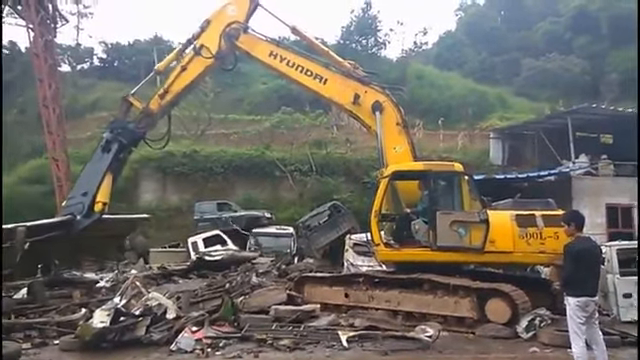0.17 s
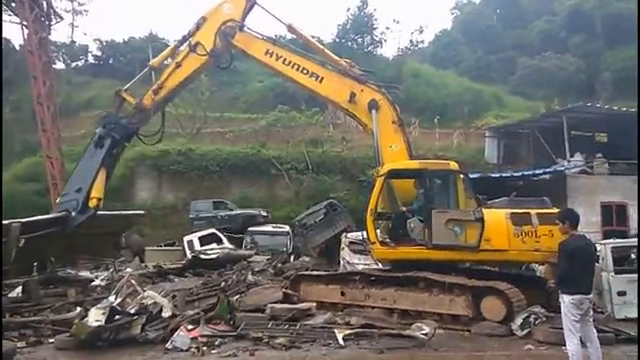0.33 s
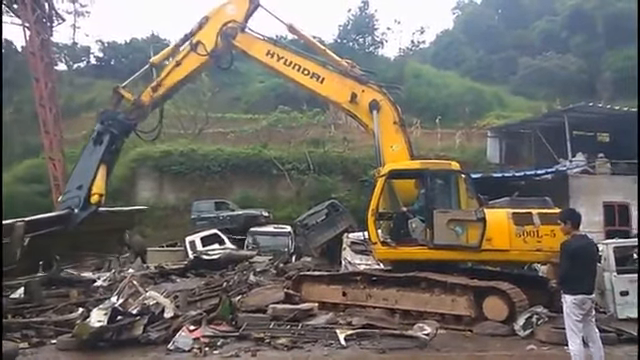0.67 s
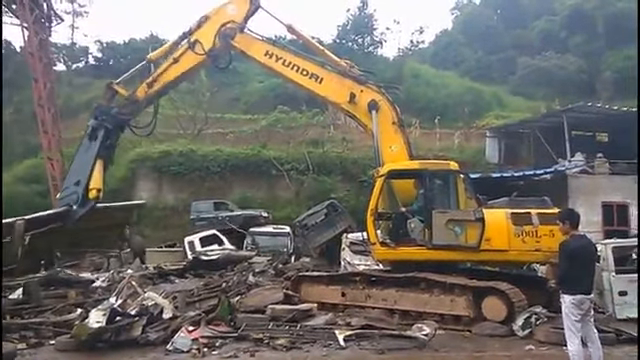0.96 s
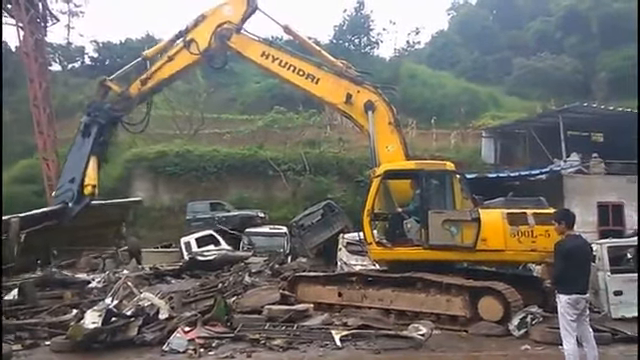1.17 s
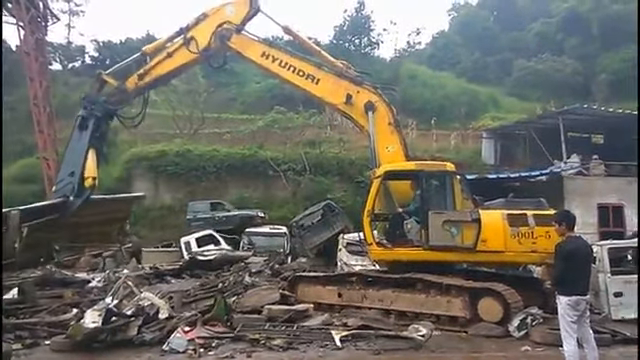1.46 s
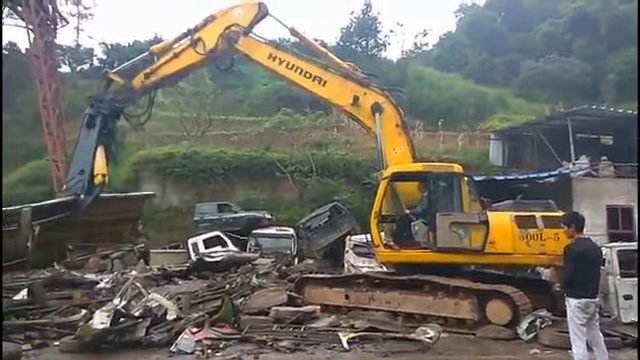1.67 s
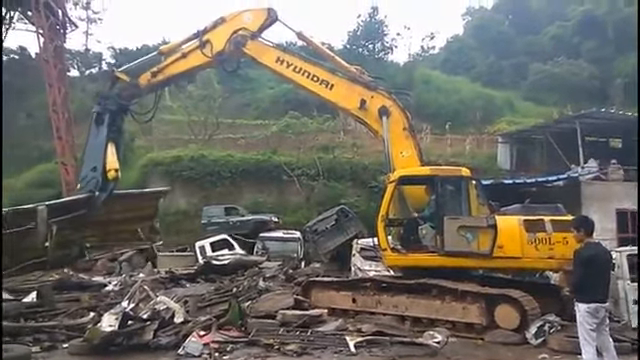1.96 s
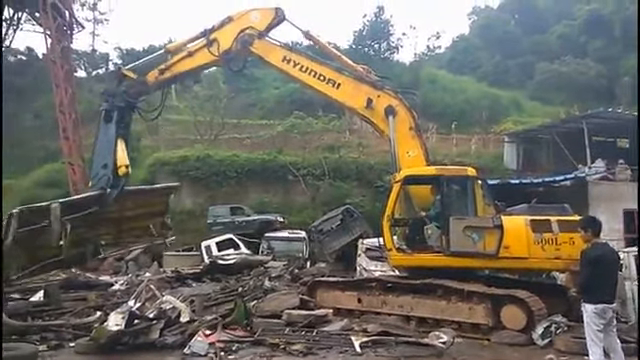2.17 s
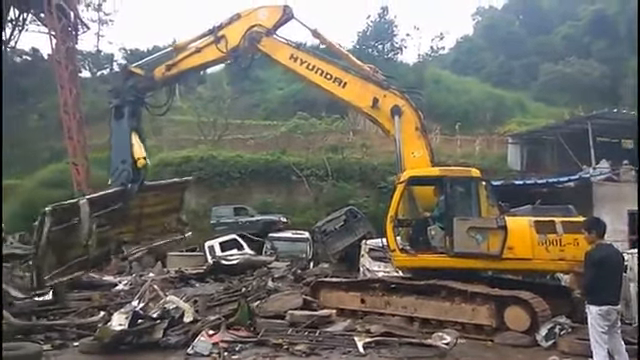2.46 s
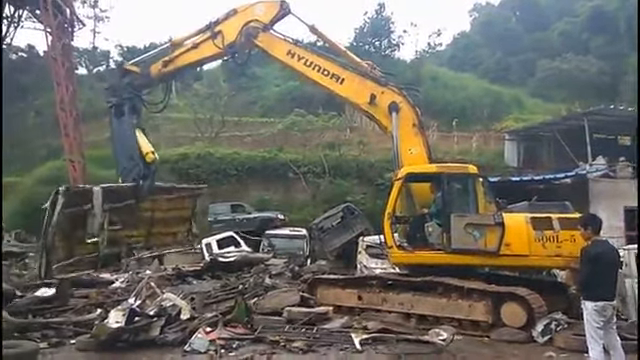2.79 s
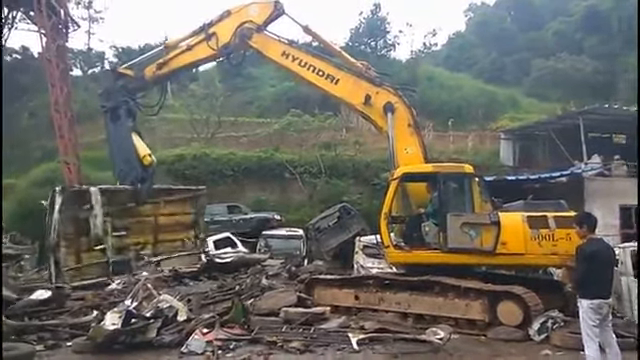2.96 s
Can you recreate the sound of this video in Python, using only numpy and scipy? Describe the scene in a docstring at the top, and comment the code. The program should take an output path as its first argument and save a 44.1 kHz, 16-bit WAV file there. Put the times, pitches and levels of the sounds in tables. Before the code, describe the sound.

A diesel excavator drones at steady high speed throughout, a rough low roar with pump hum and faint gear whine. Until about 1.2 s only the engine is heard; then scattered scrap rattles and clinks. Around 2.1 s a steel truck bed thuds and groans, the hum dipping. From 2.6 s louder hollow booms, clangs and grinding crowd together, still going at 3.1 s, with brief open-yard echoes.

```python
"""A steady engine roar, pump hum and whine: a diesel excavator idles high in an open scrapyard.
Its shear tips up a steel truck bed: scrap clatters and clangs, then the bed booms, groans and grinds.
Roar is banded noise gated by the firings; hum and whine are sines locked to the shaft.
Metal is rings driven by random ticks and soft blows, groans are sagging sines; the yard echoes it."""
import sys
import numpy as np
from scipy import signal
from scipy.fft import rfft, irfft, next_fast_len
from scipy.io import wavfile

SR = 44100
rng = np.random.default_rng(int(sys.argv[2]) if len(sys.argv) > 2 else 0)


def convert_level_to_amplitude(level_db):
    """Map a level in decibels to its linear amplitude factor."""
    exponent = np.asarray(level_db, float) / 20
    return 10 ** exponent


def master_out(mix):
    """Clip the mix to full scale and print it as 16-bit PCM to the path in sys.argv[1]."""
    frames = np.transpose(np.atleast_2d(mix))
    ceiling = np.clip(frames, -1, 1)
    pcm = np.round(ceiling * 32767).astype(np.int16)
    wavfile.write(sys.argv[1], SR, pcm)


N = 138033
T_S = np.arange(N) / SR

# engine speed: time_s, turns_per_s
SHAFT = [(0, 24.4), (.4, 24.2), (.9, 24.5), (1.8, 24.55), (2.3, 24.35), (3.13, 24.4)]
# piston pump pulses: multiple of pulse rate, level_db rms
PUMP = [(1, -35), (2, -43.5), (3, -45), (4, -48)]
# hum fades as the load comes on: time_s, gain_db
PUMP_FADE = [(0, 0), (.4, -2), (.8, 0), (2.05, 0), (2.09, -6), (2.26, -3), (2.33, -9), (3.13, -10)]
# exhaust orders: multiple of firing rate, level_db rms
EXHAUST = [(1, -47), (4 / 3, -44)]
# gear whine: mean_pitch_hz, level_db rms
WHINE = [(1020, -49), (1447, -46.5)]
# roar spectrum: freq_hz, relative_level_db
ROAR = [(18, -47.5), (30, -15.5), (57, -9), (78, -6.5), (97, -6), (141, -9), (162, -12), (190, -8.5),
        (251, -10), (323, -12), (425, -8.5), (500, -14.5), (645, -9), (720, -11), (820, -17), (955, -19),
        (1050, -12), (1480, -16.5), (1660, -24.5), (1850, -18), (2960, -21), (3750, -28), (4700, -25.5),
        (5510, -23.5), (6100, -29), (6800, -33.5), (7200, -33), (7600, -19.5)]
# relative strength of each cylinder: level_db
CYLINDER_DB = [0, -7, -2, -9, -4, -7]
# scrap slips: peak_s, treble_db, low_db (900 Hz), mid_db (2500 Hz), fall_t60_s
CLATTER = [(1.193, -21, -16.5, -25, 0.077), (1.213, -25.5, -31.5, -25, 0.13),
           (1.3696, -20.5, -26.5, -31, 0.18), (1.529, -28, -31.5, -39.5, 0.44), (1.563, -27, -30, -34, .15),
           (1.5785, -20.5, -32.5, -36.5, 0.13), (1.604, -24, -31.5, -25.5, 0.1),
           (1.6277, -22.5, -30, -52.5, 0.16), (1.747, -23, -30, -34, 0.1),
           (1.905, -18, -36.5, -22.5, 0.076), (1.934, -21, -43, -37.5, 0.078),
           (2.091, -21, -24.5, -17.5, 0.075), (2.122, -20.5, -36, -32.5, 0.1),
           (2.15, -21, -29, -22.5, 0.23), (2.2884, -30.5, -15.5, -29, 0.2),
           (2.608, -21.5, -22.5, -17, 0.25), (2.631, -24, -17.5, -26, 0.39),
           (2.71, -26, -10.5, -12.5, 0.11), (2.8181, -40.5, -9, -14.5, 0.067),
           (2.872, -13, -14, -16.5, 0.08), (2.886, -20, -10, -20.5, 0.045), (2.911, -17, -21.5, -24.5, 0.1),
           (2.931, -22, -23, -20, 0.088), (2.9698, -19, -27, -19.5, 0.25), (3.108, -33, -8, -25, 0.28)]
# loose scrap colour: freq_hz, gain_db
SCRAP = [(400, -15.5), (900, -17), (1700, -14.5), (2500, -12), (4200, -14.5), (5600, -11.5), (6300, -14.5),
         (6900, -19), (7600, -5)]
# bed dragged over the pile: time_s, deep_groan_db, higher_groan_db, grind_db
DRAG = [(1.9, -58.5, -70.5, -42), (2.042, -49.5, -42, -40.5), (2.079, -50.5, -38.5, -34.5),
        (2.139, -36, -34, -32), (2.2, -35.5, -48.5, -37.5), (2.27, -39, -39.5, -42.5),
        (2.345, -34.5, -45.5, -39), (2.42, -33, -46.5, -39), (2.52, -42, -45.5, -40),
        (2.571, -33, -32.5, -26.5), (2.63, -38, -29.5, -33.5), (2.721, -28.5, -36.5, -28),
        (2.769, -27.5, -32, -26.5), (2.801, -41.5, -31.5, -24), (2.859, -47.5, -26.5, -30),
        (2.899, -38.5, -34, -27.5), (2.97, -29.5, -36, -29), (3.04, -32.5, -31, -30),
        (3.09, -33, -31, -28.5), (3.13, -19, -24, -33.5)]
# grinding colour: freq_hz, gain_db
GRIND = [(400, -14.5), (900, -13.5), (2500, -5.5), (4000, -11), (5700, -8.5), (7600, -12)]
# single plates clang: start_s, pitch_hz (lower of a pair), drive_db, length_s
CLANGS = [(1.187, 2636, -32.5, .025), (1.189, 3910, -31, 0.025), (1.553, 3900, -30.5, .055),
          (1.575, 5900, -32, 0.021), (1.623, 6530, -36, .015), (1.632, 5350, -37, .04),
          (2.072, 717, -32.5, 0.057), (2.145, 5620, -26, .012), (2.624, 735, -26.5, .02),
          (2.694, 5700, -28.5, .03), (2.866, 5830, -27, .025), (2.871, 4860, -31, 0.024),
          (2.881, 1970, -23.5, 0.01), (2.964, 5200, -24.5, .022), (2.965, 2450, -31.5, 0.027),
          (2.604, 783, -25.5, .03), (2.701, 1118, -22.5, 0.025), (2.809, 1277, -27, 0.043),
          (2.877, 1064, -25.5, 0.047), (2.88, 1476, -28, 0.028), (2.912, 820, -24.5, 0.02),
          (3.121, 813, -31.5, 0.099)]
# bed slips in step with a deep mode: start_s, pitch_hz (at onset), level_db, length_s
GROANS = [(2.025, 232.7, -28.5, .055), (2.111, 256.5, -26, .05), (2.112, 124.2, -28.5, .1),
          (2.605, 119.5, -20, 0.15), (2.77, 246.5, -19.5, .075), (2.83, 219.2, -25.5, .06),
          (3.02, 226.7, -27.5, 0.081)]
# bed is struck: start_s, relative_peak_db, way (1 pushed in, -1 sprung out)
BLOWS = [(2.09, -8, -1), (2.128, -11.5, 1), (2.169, -23.5, -1), (2.192, -12, 1), (2.619, -5.5, -1),
         (2.633, -7, 1), (2.693, -7, 1), (2.713, -6.5, -1), (2.797, -10.5, 1), (2.832, -14.5, 1),
         (3.112, -10, 1)]
# truck bed modes: pitch_hz, gain_db, free_t60_s
BED = [(59.6, -11.5, 0.07), (119.7, -3.5, 0.24), (136.2, -3.5, 0.21), (168.5, -4.5, 0.036),
       (213, -6, 0.072), (252.3, -1, 0.13), (317.2, -7.5, 0.43), (357, -7, 0.69), (448, -18, 0.43),
       (550, -16.5, 0.11), (746, -8, 0.12), (1090, -23.5, 0.17)]
# off the piles and slope: delay_s, gain_db
ECHOES = [(.021, -11.5), (.037, -13), (.066, -14), (.11, -16.5)]
# left-right likeness: freq_hz, correlation
LIKENESS = [(60, 1), (180, 1), (370, 0.99), (540, 0.88), (780, 0.83), (1120, 0.26), (1480, -0.0049),
            (1620, -0.36), (1780, -0.43), (1950, -0.13), (2600, -0.15), (3450, -0.02), (3780, 0.31),
            (4150, 0.22), (4850, -0.07), (7000, 0.027)]
# left minus right: freq_hz, difference_db
LEAN = [(60, 0), (400, 0.5), (760, -1), (1100, -0.5), (1500, -4), (1970, 1.5), (2700, 5), (3700, 2.5),
        (4400, 0.5), (5500, 13), (6100, 9), (6800, 3), (7400, 2.5)]

FIRINGS_PER_TURN, PISTONS_PER_TURN = 3, 9
ROAR_DB, BAND_WANDER_DB, BAND_WANDER_HZ = -28.5, 2., 10.7  # rate at the lowest band; treble is faster
THROB_SHARE, THROB_DECAY_S = .055, .0096  # share of roar gated by firings
LINE_WAVER_DB, UPPER_FLUTTER_DB, PUMP_JITTER = 1., 3.5, .002  # jitter: share of shaft speed
RISE_S, SCRAP_RING_CYCLES = .005, 150
TICKS_PER_S, TICK_SPREAD_DB = 1800., 3
RING_WANDER_DB = 3.  # random level wander of each scrap ring
CLANG_T60_S = .058  # at 1 kHz; higher plates die sooner
GROAN_SAG = .034  # share of pitch lost along a groan
SLIPS_PER_S, DEEP_HZ, BED_FLOOR_HZ = 300., 190, 61.4
BLOW_CONTACT_S, BLOW_GAIN_DB = .0006, -10.5
BLOW_DAMPING = .12  # share of the free t60 left when pressed on the pile
BLOW_FLOOR_HZ = 80  # high-pass on the blows keeps their lowest bass thin
SIDE_BASS_WANDER_DB, SIDE_BASS_HZ = 14, 780  # bass of the side signal drops in and out; its corner
TOP_HZ = 8440


def rms_one(x):
    """Scale to rms 1."""
    return x / np.sqrt(np.mean(x ** 2) + 1e-20)


def in_time(rows):
    """Columns of a table joined by lines in time."""
    time_s, *columns = np.transpose(rows)
    return [np.interp(T_S, time_s, column) for column in columns]


def at_hz(points, hz):
    """Read a table on a log-frequency axis."""
    table_hz, value = np.transpose(points)
    return np.interp(np.log(hz + 1e-3), np.log(table_hz), value)


def drift(rate_hz):
    """Slow random wander of rms 1: noise through two equal low-pass poles."""
    pole = np.exp(-80 * np.pi * rate_hz / SR)  # runs at SR / 40
    noise = rng.standard_normal(N // 40 + 2002)
    slow = signal.lfilter([1], [1, -2 * pole, pole * pole], noise)[2000:]
    return np.interp(np.arange(N) / 40, np.arange(len(slow)), rms_one(slow))


def ring(clicks, hz, t60_s):
    """Resonator: a unit click starts a decaying sine of height 1."""
    r, w = convert_level_to_amplitude(-60 / (t60_s * SR)), 2 * np.pi * hz / SR
    return signal.lfilter([0, np.sin(w)], [1, -2 * r * np.cos(w), r * r], clicks + 1e-18)


def driven(force, hz, t60_s):
    """A ring kept going by a click train, at about the power of the train."""
    return ring(force, hz, t60_s) * np.sqrt(4 * np.log(1000) / (t60_s * SR))


def ticks(rate_per_s, spread_db):
    """Two random trains of uneven clicks of either sign, joint rms 1."""
    size_db = spread_db * np.minimum(rng.exponential(1, (2, N)), 4)
    size = convert_level_to_amplitude(size_db) * rng.choice([-1, 1], (2, N))
    return rms_one(size * (rng.random((2, N)) < rate_per_s / SR))


def roar(turns):
    """Casing, fan and exhaust noise throbs with each firing; its third-octaves wander at random."""
    fired = turns * FIRINGS_PER_TURN
    decay_firings = THROB_DECAY_S * FIRINGS_PER_TURN * SHAFT[0][1]
    gate = convert_level_to_amplitude(np.array(CYLINDER_DB)[fired.astype(int) % 6]) * np.exp(-(fired % 1) / decay_firings)
    hz = np.fft.rfftfreq(N, 1 / SR)
    tinted = rfft(rng.standard_normal((2, N))) * convert_level_to_amplitude(at_hz(ROAR, hz))
    out = 0
    for k in range(26):
        band = np.clip(1 - abs(3 * np.log2((hz + 1) / 25) - k), 0, 1)
        wander_db = BAND_WANDER_DB * drift(BAND_WANDER_HZ * np.sqrt(1 + k / 4))
        out = out + irfft(tinted * band, N) * convert_level_to_amplitude(wander_db)
    throb = 1 - THROB_SHARE + THROB_SHARE * rms_one(gate)
    return convert_level_to_amplitude(ROAR_DB) * rms_one(out * throb)


def tones(turns):
    """Pump pulses, exhaust orders and gear whine as wavering sines locked to the shaft."""
    jitter = np.cumsum(PUMP_JITTER * SHAFT[0][1] * drift(16.7)) / SR
    pump = PISTONS_PER_TURN * (turns + jitter)
    fade_db = in_time(PUMP_FADE)[0]
    lines = [(k * pump, db + fade_db + (k > 1) * UPPER_FLUTTER_DB * drift(22)) for k, db in PUMP]
    lines += [(k * FIRINGS_PER_TURN * turns, db) for k, db in EXHAUST]
    whine_s = pump / pump[-1] * T_S[-1]  # time warped to follow the pump
    lines += [(hz * whine_s, db + UPPER_FLUTTER_DB * drift(9)) for hz, db in WHINE]
    out = 0
    for cycles, db in lines:
        height = np.sqrt(2) * convert_level_to_amplitude(db + LINE_WAVER_DB * drift(13))
        out = out + height * np.sin(2 * np.pi * (cycles + rng.random()))
    return np.array([out, np.roll(out, 60)])


def scrap(grind_db):
    """Ticks dealt to 80 sheet-metal rings; each slip swells fast and dies with its own colour."""
    peak_s, treble_db, low_db, mid_db, fall_s = np.transpose(CLATTER)
    late_s = T_S - peak_s[:, None]
    rise = np.exp(np.minimum(late_s, 0) / RISE_S)
    fall = convert_level_to_amplitude(-60 * np.maximum(late_s, 0) / fall_s[:, None])
    swell = np.where(late_s < 0, rise, fall)
    pitches_hz = np.linspace(20, 87, 80) ** 2 * rng.uniform(.99, 1.01, 80)
    train = ticks(TICKS_PER_S, TICK_SPREAD_DB)
    dealt = rng.integers(0, 8, (2, N))  # ten rings share each hand
    out = 0
    for k, hz in enumerate(pitches_hz):
        slip_db = [np.interp(np.log(hz), np.log([900, 2500, 4500]), c)
                   for c in zip(low_db, mid_db, treble_db)]
        clatter = convert_level_to_amplitude(np.array(slip_db) + at_hz(SCRAP, hz)) @ swell
        force = clatter + convert_level_to_amplitude(grind_db + at_hz(GRIND, hz))
        wander = convert_level_to_amplitude(RING_WANDER_DB * drift(7.4))
        out = out + driven(force * wander * train * (dealt == k % 8), hz, SCRAP_RING_CYCLES / hz)
    return out


def clangs():
    """Each plate is rattled briefly and rings at a close pair of pitches."""
    rattle = ticks(2500, 2.8)
    out = 0
    for start_s, hz, db, length_s in CLANGS:
        force = convert_level_to_amplitude(db) * rattle * np.sin(np.pi * np.clip((T_S - start_s) / length_s, 0, 1))
        t60_s = CLANG_T60_S * np.sqrt(1000 / hz)
        out = out + driven(force, hz, t60_s) + driven(force[::-1], hz * 1.05, t60_s)
    return out


def groans():
    """Stick-slip in step with a mode: short, slightly sagging tones that swell and fade."""
    start_s, hz, db, length_s = np.transpose(GROANS)[:, :, None]
    part = np.clip((T_S - start_s) / length_s, 0, 1)
    cycles = hz * length_s * (part - GROAN_SAG * part ** 2 / 2)
    tone = np.sin(2 * np.pi * (cycles + rng.random((len(start_s), 1))))
    swell = np.sqrt(np.sin(np.pi * part) + 1e-12) * (part > 0) * (part < 1)
    out = np.sum(np.sqrt(2) * convert_level_to_amplitude(db) * swell * tone, axis=0)
    return np.array([out, np.roll(out, 60)])


def bed(deep_db, higher_db):
    """Stick-slip dragging and soft heavy blows ring the modes of the truck bed."""
    slips = ticks(SLIPS_PER_S, .92)
    soft = np.exp(-1 / (BLOW_CONTACT_S * SR))
    start_s, peak_db, way = np.transpose(BLOWS)
    thin = signal.butter(2, BLOW_FLOOR_HZ, "high", fs=SR, output="sos")
    out = 0
    for hz, db, t60_s in BED:
        drag = convert_level_to_amplitude(db + (deep_db if hz < DEEP_HZ else higher_db)) * slips
        hits = np.zeros((2, N))
        uneven_db = rng.normal(0, 1.3, (2, len(start_s)))
        hits[:, (start_s * SR).astype(int)] = np.sign(way) * convert_level_to_amplitude(peak_db + BLOW_GAIN_DB + uneven_db)
        push = signal.sosfilt(thin, signal.lfilter([1 - soft], [1, -soft], hits))
        boom = convert_level_to_amplitude(db / 2) * ring(push, hz, t60_s * BLOW_DAMPING)  # blows even out the mode gains
        out = out + driven(drag, hz, t60_s) + boom
    return signal.sosfilt(signal.butter(4, BED_FLOOR_HZ, "high", fs=SR, output="sos"), out)


def yard(metal):
    """Delayed, dulled echoes of the metal, with the two fields swapped."""
    out = 0
    for delay_s, db in ECHOES:
        out = out + convert_level_to_amplitude(db) * np.pad(metal[::-1], ((0, 0), (int(delay_s * SR), 0)))[:, :N]
    return signal.lfilter([.5], [1, -.5], out)


def scene():
    """Two sound fields: what comes from ahead and what is scattered from the sides."""
    turns = np.cumsum(in_time(SHAFT)[0]) / SR
    deep_db, higher_db, grind_db = in_time([(0, -90, -90, -90)] + DRAG)
    metal = scrap(grind_db) + clangs() + groans() + bed(deep_db, higher_db)
    return roar(turns) + tones(turns) + yard(metal) + metal


def band_limit(x):
    """A steep low-pass at the top of the band."""
    return signal.sosfilt(signal.butter(12, 7590, fs=SR, output="sos"), x)


def record(dry):
    """Two close ports: alike in the bass, unlike and leaning left in the treble; the top is cut."""
    size = next_fast_len(N + 4096)
    hz = np.fft.rfftfreq(size, 1 / SR)
    ahead, sides = dry
    bass = signal.sosfilt(signal.butter(1, SIDE_BASS_HZ, fs=SR, output="sos"), sides)
    bass_gain = np.minimum(convert_level_to_amplitude(SIDE_BASS_WANDER_DB * drift(3.8)), 2)
    ahead, sides = rfft([ahead, sides + bass * (bass_gain - 1)], size)
    alike = np.clip(at_hz(LIKENESS, hz), -.99, .995)
    left_right = np.array([[1], [-1]])
    lean = convert_level_to_amplitude(at_hz(LEAN, hz) / 2 * left_right)
    both = lean * (np.sqrt(1 + alike) * ahead + np.sqrt(1 - alike) * sides * left_right) / np.sqrt(2)
    top_cut = signal.cheby2(16, 80, TOP_HZ, fs=SR, output="sos")
    mix = signal.sosfilt(top_cut, irfft(both, size)[:, :N])
    return band_limit(mix)


dry = scene()
out = record(dry)
master_out(out)
```